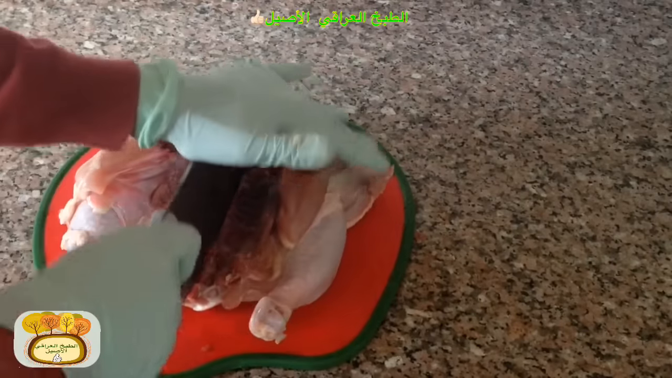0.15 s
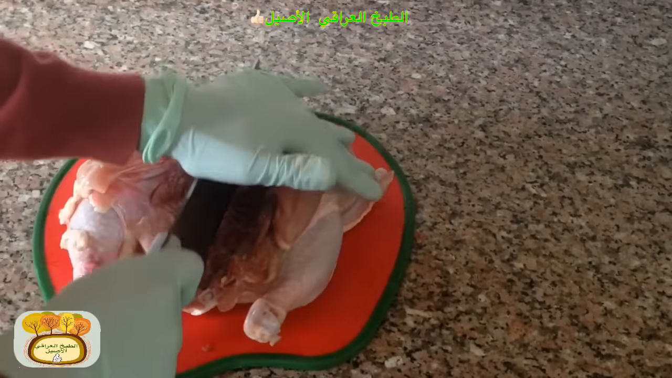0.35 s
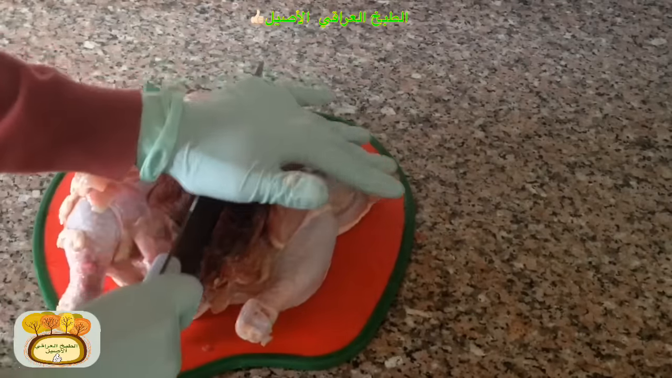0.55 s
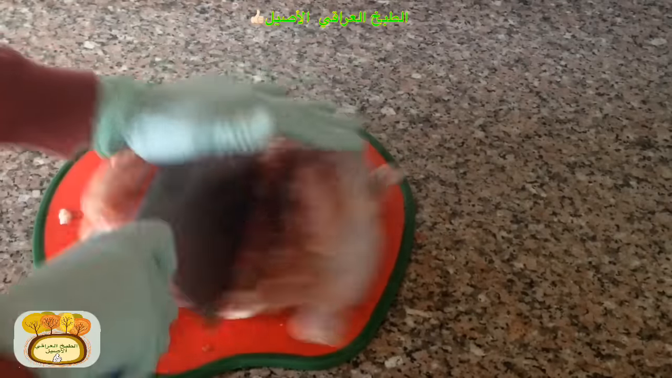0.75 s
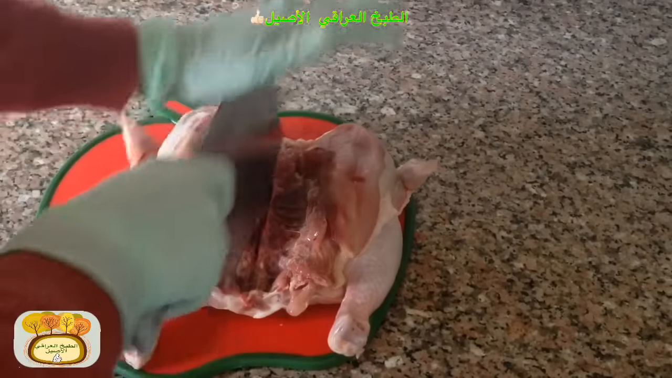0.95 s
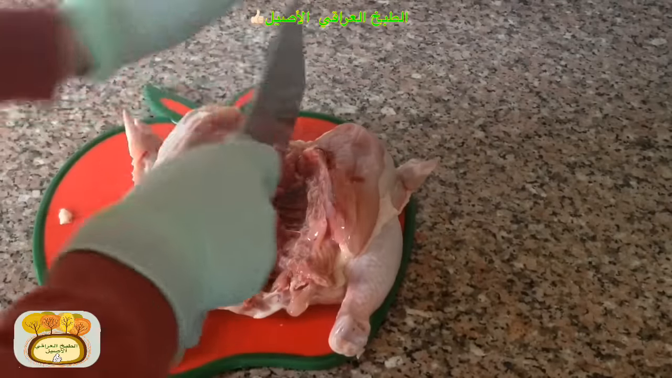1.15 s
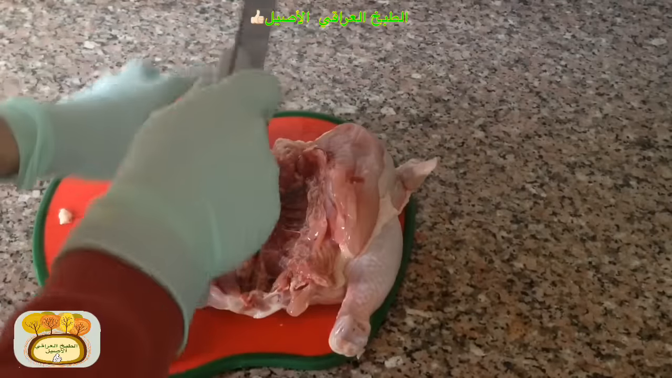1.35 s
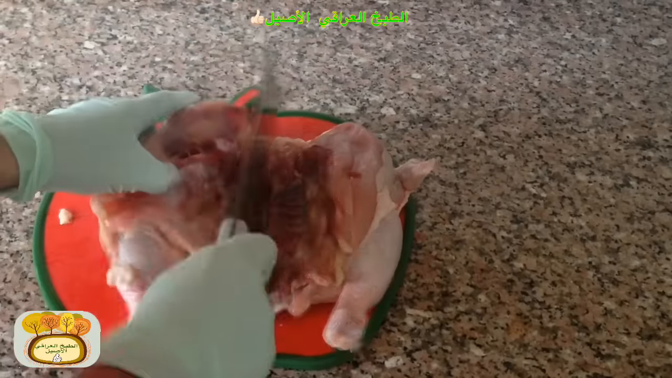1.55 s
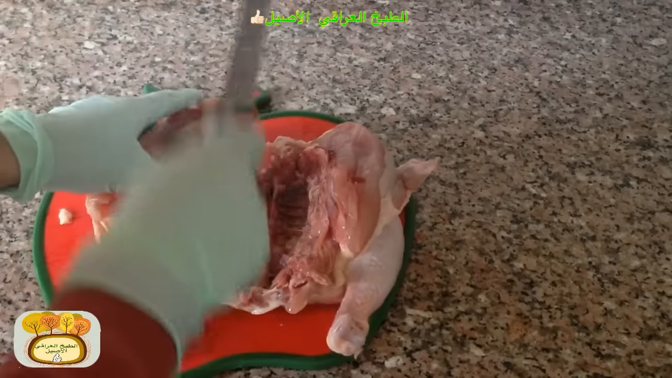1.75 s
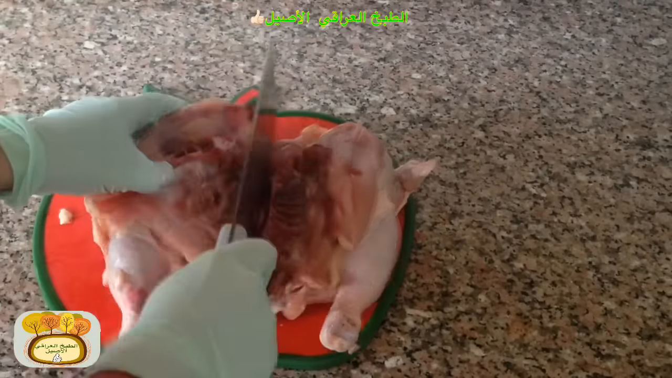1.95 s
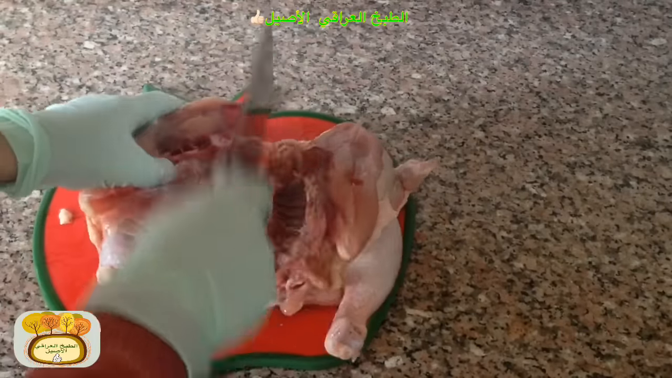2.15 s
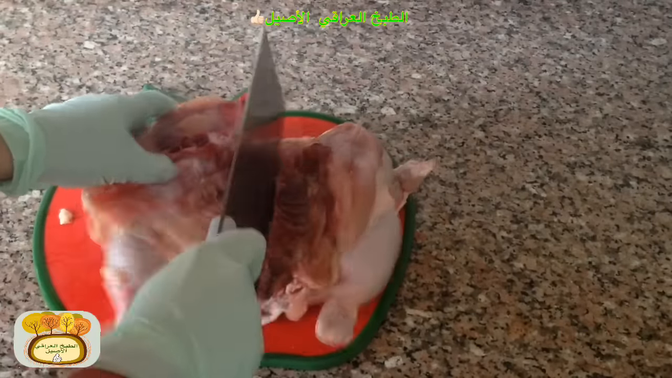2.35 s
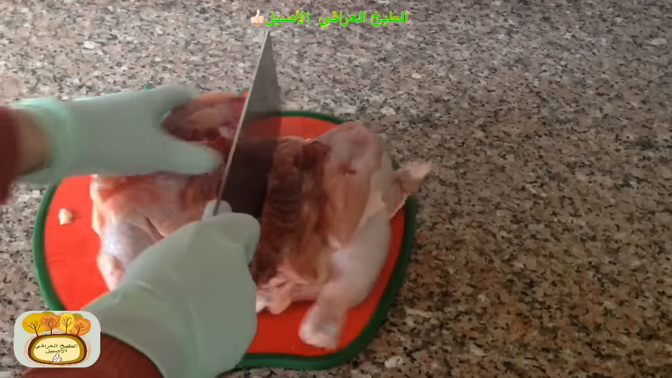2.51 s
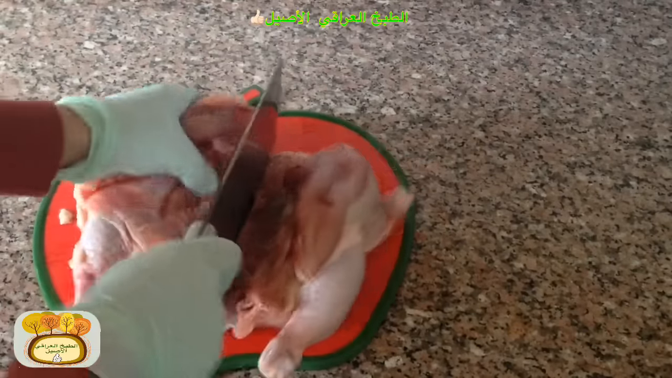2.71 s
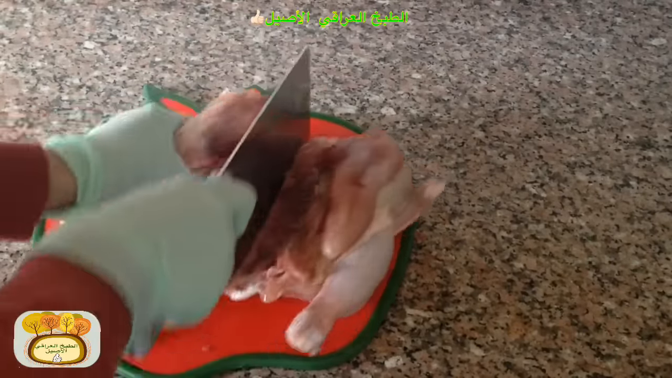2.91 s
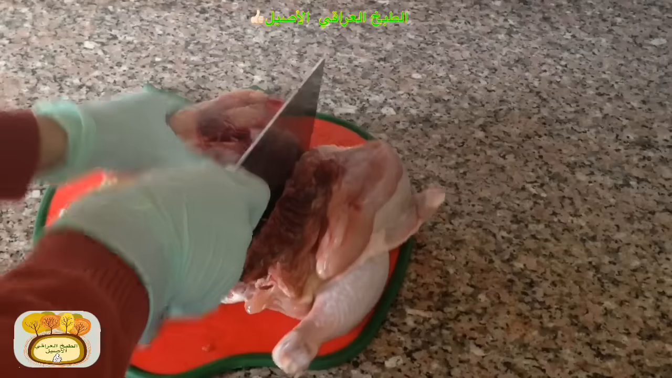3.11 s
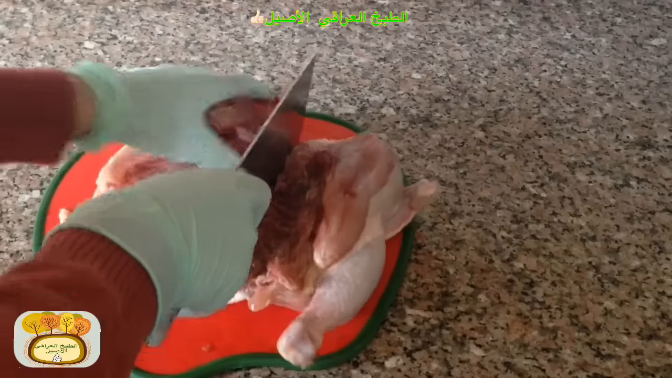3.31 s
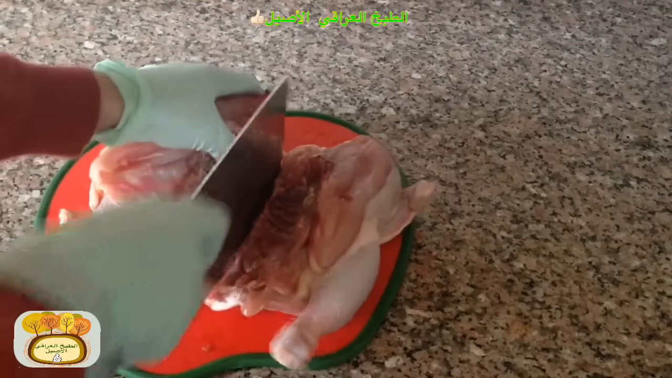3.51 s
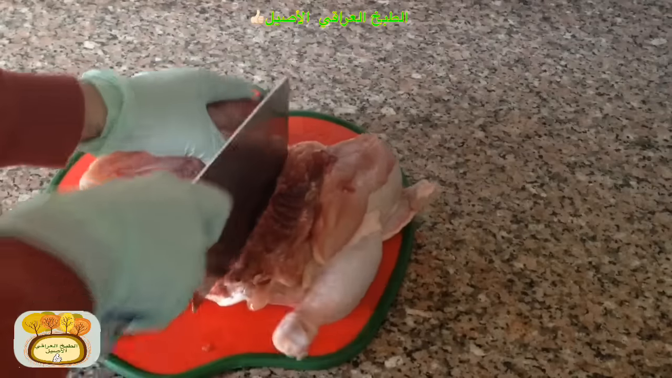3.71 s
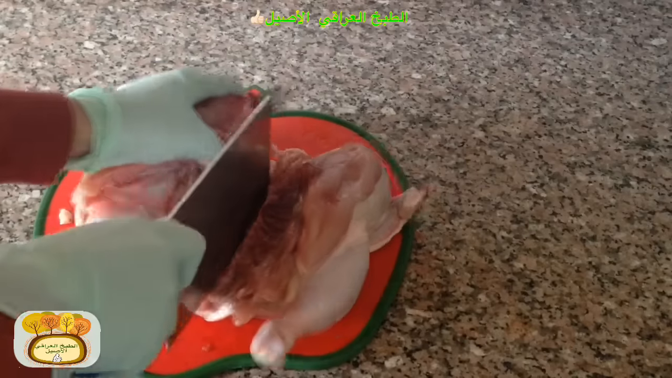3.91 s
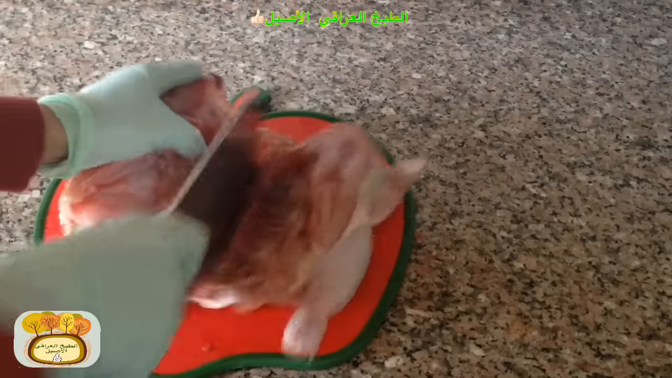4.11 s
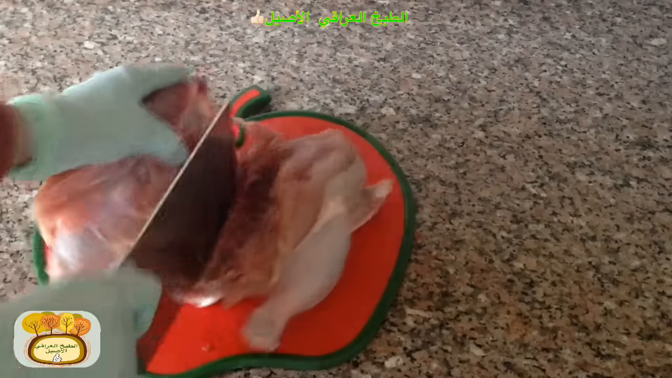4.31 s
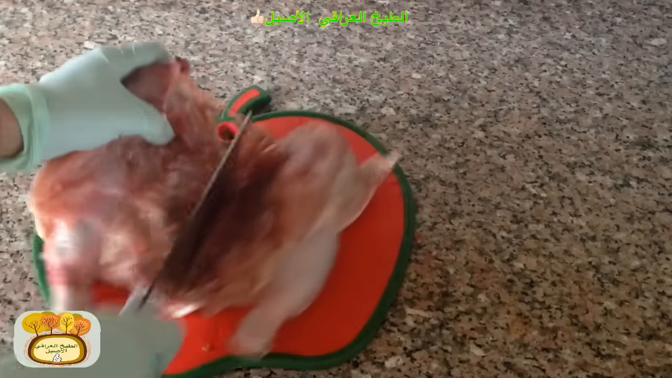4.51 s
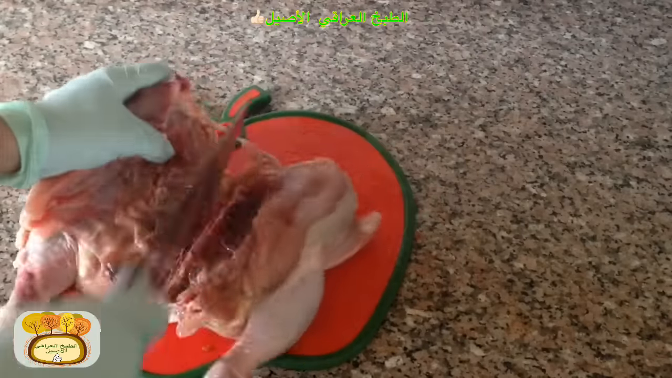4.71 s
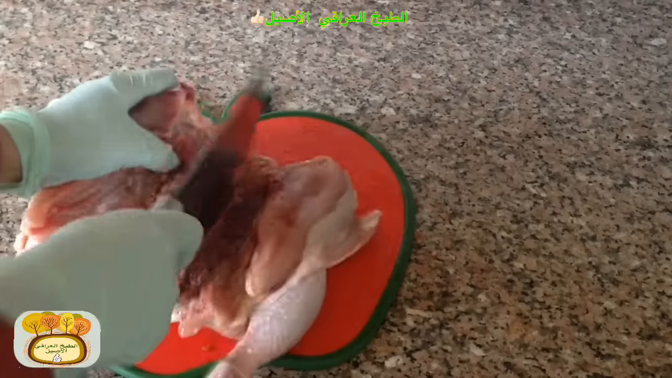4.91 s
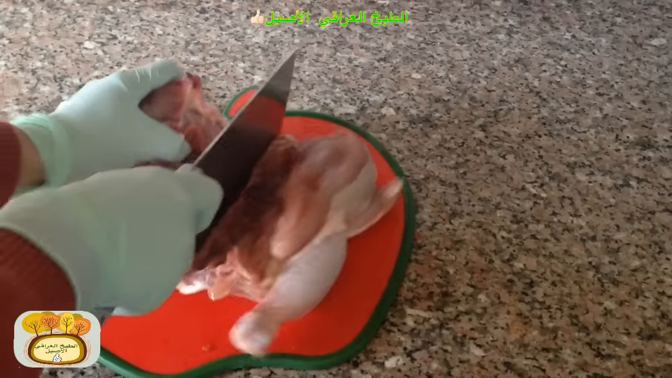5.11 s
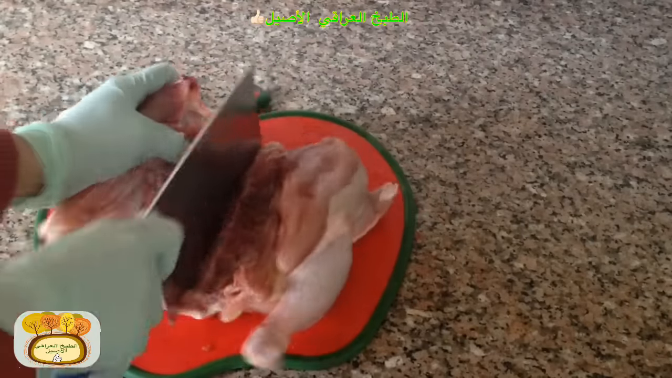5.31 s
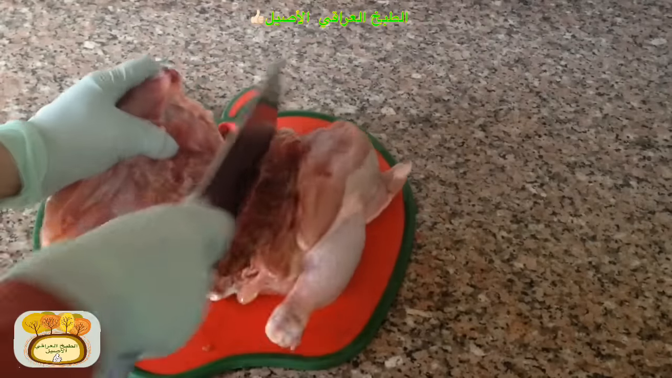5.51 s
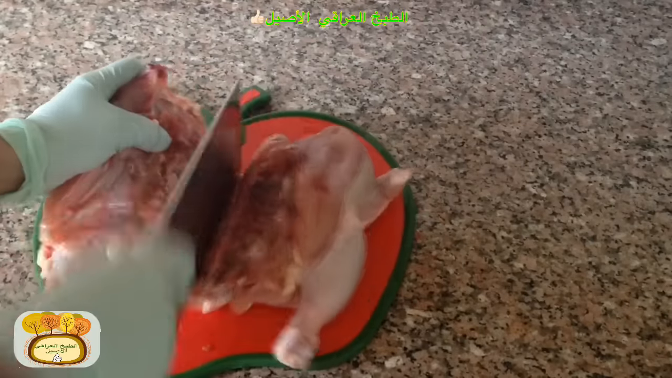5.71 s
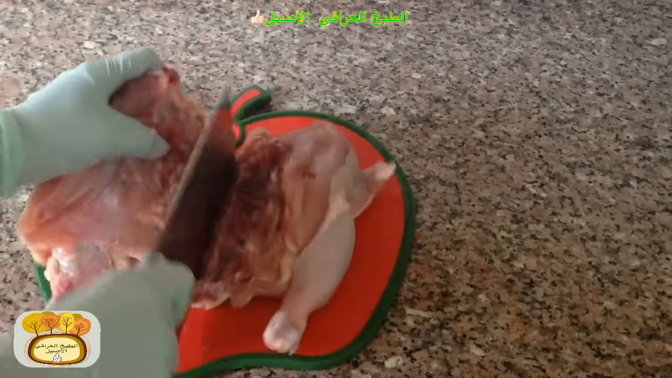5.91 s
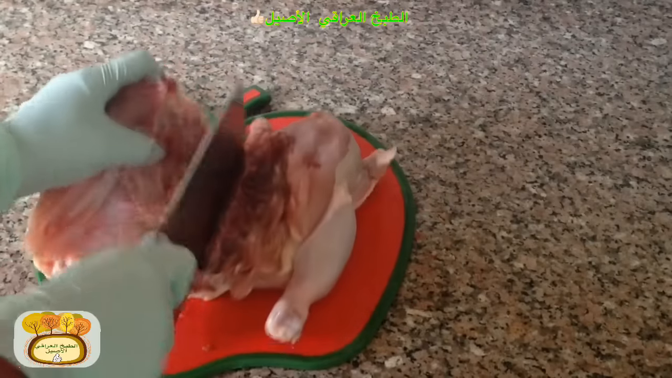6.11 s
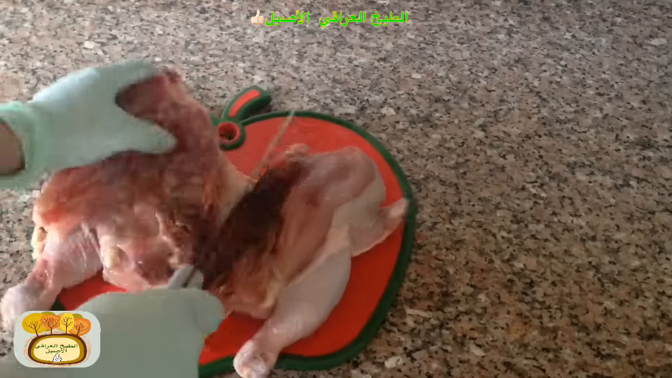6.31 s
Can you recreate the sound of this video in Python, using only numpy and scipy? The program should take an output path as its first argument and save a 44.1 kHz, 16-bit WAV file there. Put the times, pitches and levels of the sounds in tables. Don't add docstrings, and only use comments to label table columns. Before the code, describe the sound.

A nearby phone hears chicken being cut on a plastic board over a stone counter, in a bare kitchen with nearly a second of reverberation. Faint hiss opens the scene. Around 0.36 s two woody chops land almost together, with a soft rock of the board, then small snaps, sticky peels and glove rubs until about 0.9 s. At 1.6 s a slow cut squelches in with a deep low thud; at 2.0 s a harder chop tears and knocks; at 2.4 s comes the loudest, a bright, hard crack whose tail fades across the room. From 2.7 s only light clicks and peels follow, with a crisp bone snap at 3.7 s amid rubber rustle. Tiny wet ticks and meat drags continue. At 5.3-5.45 s two light blade taps mingle with sharp cartilage cracks, then sparse crackles and faint rubbing last to about 6.3 s.

```python
import sys
import numpy as np
from scipy import signal
from scipy.fft import rfft, irfft
from scipy.io import wavfile

SR = 44100
rng = np.random.default_rng(int(sys.argv[2]) if len(sys.argv) > 2 else 0)


def convert_level_to_amplitude(level_db):
    exponent = np.asarray(level_db, float) / 20
    return 10 ** exponent


def unload_wav(signal):
    wavfile.write(
        sys.argv[1],
        SR,
        np.round(np.clip(np.atleast_2d(signal).T, -1, 1) * 32767).astype(np.int16),
    )


N = 280035


def level(x, db):
    return x * convert_level_to_amplitude(db) / np.sqrt(np.mean(x ** 2))


def peak(x, db):
    return x * convert_level_to_amplitude(db) / np.abs(x).max()


def on_log(hz, table):
    at, value = np.transpose(table)
    return np.interp(np.log(np.maximum(hz, 1)), np.log(at), value)


def colour(x, table):
    hz = np.fft.rfftfreq(len(x), 1 / SR)
    return irfft(rfft(x) * convert_level_to_amplitude(on_log(hz, table)), len(x))


def ring(x, hz, width_hz):
    pole = np.exp((2j * np.pi * hz - np.pi * width_hz) / SR)
    return signal.lfilter([1], [1, -pole], x).imag


def add(out, start_s, x):
    i = int(start_s * SR)
    out[i:i + len(x)] += x[:N - i]


def crackle(size, scatter_db):
    strength = np.minimum(rng.exponential(size=size), 4.5)
    return rng.standard_normal(size) * convert_level_to_amplitude(scatter_db * strength)


def blows(spread):
    # start_s, board_db, tear_db, sink_s, thud_db
    blow_table = [
        (0.3639, -12, -7.5, 0.00037, -34.5),
        (0.387, -12.5, -12, 0.00045, -33),
        (1.604, -10, -12, 0.004, -11.5),
        (2.0062, -3.5, -0.5, 0.0024, -19),
        (2.408, 3.5, 4, 0.0012, -41.5),
        (5.341, -23, -28, 0.0011, -26.5),
        (5.4122, -21.5, -39.5, 0.002, -41),
    ]
    # frequency_hz, width_hz, level_db
    board_modes = [
        [(1000, 140, -2.5), (1216, 99, 3.5), (2282, 430, -16), (3330, 210, -5.5), (8300, 2000, -5)],
        [(1030, 160, 17), (1332, 200, -4.5), (8000, 1500, -11)],
        [(580, 100, -5.5), (797, 150, -5.5), (1230, 210, -1.5), (1526, 220, -9)],
        [(378, 36, -19.5), (577, 110, -13), (1020, 62, -3), (1700, 54, -13), (2070, 120, -19.5),
         (3100, 140, -23.5)],
        [(503, 81, -17.5), (783, 71, -3.5), (1090, 130, -0.5), (1288, 99, -7.5), (1520, 62, -0.5),
         (2480, 320, -3), (3900, 190, 0)],
        [(580, 38, -13), (1175, 130, -7), (1980, 390, -16)],
        [(596, 85, 0.5), (1290, 110, -5), (1860, 340, 5)],
    ]
    # frequency_hz, density_db
    tear_colour = [(880, -1.5), (1500, -2.5), (3380, -7.5), (4780, -12), (12100, -17), (13400, -27.5),
                   (15200, -20.5), (16000, -15)]
    thud_base_hz, thud_knee_db, thud_sag_hz_per_db = 214.5, -11.5, 7
    out, lead_s = np.zeros(N), 0.02
    t = np.arange(SR // 8) / SR - lead_s
    for (start_s, board_db, tear_db, sink_s, thud_db), modes in zip(blow_table, board_modes):
        cut = t + 0.48 * sink_s
        entry = np.clip(1 + cut / (4.0 * sink_s), 0, 1)
        swell = np.where(cut < 0, entry ** 2, np.exp(-cut / 0.0043))
        tear = colour(crackle(len(t), scatter_db=2.5), tear_colour) * swell

        chatter = rng.standard_normal(len(t)) * np.exp(-np.abs(t - 0.0015) / 0.00042) * (t > -sink_s)
        push = np.exp(-(t / 0.00028) ** 2) + 0.77 * chatter
        knock = np.zeros(len(t))
        for k, (hz, width_hz, db) in enumerate(modes):
            mode = ring(push, hz, spread * max(width_hz, 30))
            knock += (-1) ** k * convert_level_to_amplitude(db) * width_hz / hz * mode

        press = np.exp(-((t + 1.8 * sink_s) / 0.00068) ** 2)
        shove = press - 0.81 * np.exp(-(t / 0.00047) ** 2)
        thud_hz = thud_base_hz - thud_sag_hz_per_db * max(board_db - thud_knee_db, 0)
        cupboard = ring(shove, 115, 40) + 2.0 * ring(shove, 51, 10)
        thud = ring(shove, thud_hz, 40 * spread ** 2) + convert_level_to_amplitude(0.76 * board_db) * cupboard

        struck = peak(np.gradient(thud), thud_db) - peak(np.gradient(knock), board_db)
        add(out, start_s - lead_s, peak(tear, tear_db) + struck)
    return out


def ticks():
    # start_s, snap_db, knock_db, snap_hz
    bone_table = [(0.4844, -37, -28.5, 2530), (0.9218, -20.5, -49, 3560), (2.7267, -36, -50, 3150),
                  (2.838, -35.5, -53, 3860), (3.6371, -46, -44.5, 3760), (3.6711, -35.5, -32, 2800),
                  (3.718, -15.5, -26.5, 8150), (3.9656, -42, -49, 3230), (4.0065, -28, -35.5, 8950),
                  (4.027, -29.5, -44, 5110), (4.074, -35, -48.5, 4300), (4.3703, -45, -44.5, 6780),
                  (4.5665, -30, -52.5, 5500), (5.0025, -36.5, -49, 3900), (5.012, -35.5, -51.5, 3900),
                  (5.0896, -44.5, -58, 2730), (5.3544, -14, -36, 3300), (5.3867, -21, -35, 3270),
                  (5.4399, -34, -35, 2650), (5.8229, -40.5, -47, 3070), (5.874, -35, -40.5, 3810),
                  (5.884, -42, -37.5, 2750), (5.933, -39, -46.5, 3440), (5.973, -37, -50, 3360),
                  (6.262, -61, -47.5, 3000)]
    # start_s, snap_db, snap_hz
    peel_table = [(0.6668, -36, 4967), (0.7716, -34.5, 9300), (0.864, -47, 4100), (2.9273, -35.5, 3320),
                  (2.9895, -24, 3530), (3.209, -46, 2570), (3.4269, -46, 3430), (4.1829, -44.5, 3670),
                  (4.5525, -33.5, 5680), (4.571, -25.5, 3600), (4.6757, -48, 12500), (4.9741, -48.5, 11100),
                  (5.2447, -36, 3830), (5.2883, -32.5, 7000), (5.368, -23, 3700), (5.5518, -38, 3100),
                  (5.712, -41, 5920), (6.086, -49, 9430), (6.1654, -44, 8900), (6.3081, -42, 8700),
                  (4.113, -46, 12000), (6.257, -49.5, 9050), (6.322, -47, 8400)]
    # start_s, snap_db, edge_db, knock_db, snap_hz, decay_s
    bones = [(s, db, -17.5, knock_db, hz, 0.0042) for s, db, knock_db, hz in bone_table]
    peels = [(s, db, -9.5, db - 23, hz, 0.0034) for s, db, hz in peel_table]
    out, t = np.zeros(N), np.arange(SR // 16) / SR
    for start_s, snap_db, edge_db, knock_db, snap_hz, decay_s in bones + peels:
        envelope = np.exp(-t / decay_s) * (1 - np.exp(-t / 0.000255))
        burst = crackle(len(t), scatter_db=-0.5) * envelope
        burst = burst + 2.5 * np.exp(-((t - 0.0004) / 0.00005) ** 2)
        snap = ring(ring(burst, snap_hz, 0.51 * snap_hz), snap_hz, 0.82 * snap_hz)
        edge = np.gradient(ring(ring(burst, 10400, 8000), 8300, 7900))
        knock = ring(burst, 1377, 410) + 0.59 * ring(burst, 580, 284) + 0.246 * ring(burst, 195, 93)
        bright = peak(snap, snap_db - 2.0) + peak(edge, snap_db + edge_db + 4)
        add(out, start_s, bright + peak(knock, knock_db + 1.0))
    return out


def rubbing():
    # start_s, length_s, hiss_db
    glove_table = [(0.635, 0.033, -53.5), (0.855, 0.018, -57), (2.706, .02, -58), (2.844, 0.038, -60),
                   (3.439, 0.12, -62.5), (3.518, 0.047, -59), (3.579, 0.071, -65), (3.695, 0.076, -43),
                   (3.873, 0.098, -55), (4.005, 0.082, -49), (4.965, 0.053, -64.5), (5.705, 0.037, -59.5),
                   (6.251, 0.066, -62.5), (6.301, 0.044, -58)]
    # start_s, length_s, hiss_db, drag_db
    meat_table = [(0.35, 0.019, -66, -51), (0.787, 0.071, -56.5, -59), (0.915, 0.022, -48, -55.5),
                  (3.65, 0.057, -61, -50), (3.722, 0.032, -49, -44), (4.19, 0.12, -51.5, -67.5),
                  (4.359, 0.15, -63, -67), (4.572, 0.022, -50, -70), (4.996, 0.048, -51, -57.5),
                  (5.232, 0.062, -47, -66.5), (5.291, 0.11, -59, -77), (5.326, 0.054, -61, -41.5),
                  (5.353, 0.095, -45.5, -42), (5.777, 0.074, -52.5, -62), (5.866, 0.061, -51, -54.5),
                  (5.924, 0.077, -58.5, -66)]
    # frequency_hz, density_db
    rub_colour = [(880, -52), (1500, -27.5), (1710, -14.5), (3120, -11.5), (5440, -16), (14600, -16),
                  (15500, -35), (16000, -40)]
    # start_s, length_s, hiss_db, band_hz, drag_db
    gloves = [(s, length_s, db, 8900, db - 14.5) for s, length_s, db in glove_table]
    meat = [(s, length_s, db, 3600, drag_db) for s, length_s, db, drag_db in meat_table]
    patch_hz, patch_db = 2000 * 1.3 ** np.arange(9), 3
    out = np.zeros(N)
    for start_s, length_s, hiss_db, band_hz, drag_db in gloves + meat:
        n = int(length_s * SR)
        grain = crackle(SR // 6, scatter_db=4.0)
        dull = crackle(SR // 6, scatter_db=4.0)
        band = np.gradient(ring(grain, band_hz, 0.23 * band_hz))
        hiss = level(colour(grain, rub_colour), 0) + level(band, -14)
        hiss = colour(hiss, [(hz, patch_db * rng.standard_normal()) for hz in patch_hz])
        drag = ring(dull, 910, 1650)
        slips = convert_level_to_amplitude(1.5 * np.repeat(rng.standard_normal(SR // 600), 120))
        stroke = signal.windows.tukey(n, 0.9) * np.geomspace(1.6, 0.4, n) * slips[:n]
        add(out, start_s, stroke * (level(hiss, hiss_db) + level(drag, drag_db))[:n])
    return out


def specks(count=90):
    from_s, loudest_db, scatter_db, decay_s = 3.7, -61.5, 3.5, 0.001
    out, t = np.zeros(N), np.arange(SR // 100) / SR
    for when, pitch, size in rng.random((count, 3)):
        hz = 2500 * 5.5 ** pitch
        burst = rng.standard_normal(len(t)) * np.exp(-t / decay_s)
        pop = ring(ring(burst, hz, 0.35 * hz), hz, 0.35 * hz)
        start_s = from_s + when * (N / SR - from_s)
        add(out, start_s, peak(pop, loudest_db - scatter_db * np.log(1.01 - size)))
    return out


def rocking():
    # start_s, level_db, pitch_hz
    rock_table = [(0.422, -27, 91), (0.643, -46, 73), (0.808, -46, 116), (0.919, -69, 121),
                  (1.722, -34, 50), (2.199, -42, 61), (2.631, -41, 57.6), (2.708, -56, 91.4),
                  (2.569, -36, 99.8), (3.799, -56.5, 60), (4.072, -55, 70), (4.373, -51, 114),
                  (5.612, -61.5, 91), (5.821, -60, 120), (6.259, -57.5, 170)]
    out, t = np.zeros(N), np.arange(SR // 5) / SR
    contact = np.exp(-((t - 0.006) / 0.00084) ** 2)
    for start_s, db, hz in rock_table:
        add(out, start_s, peak(ring(contact, hz, 45), db))
    return out


def board(spread):
    small_cut = signal.butter(2, 140, "high", fs=SR, output="sos")
    heavy_cut = signal.butter(4, 42, "high", fs=SR, output="sos")
    small = signal.sosfilt(small_cut, ticks() + rubbing() + specks())
    heavy = signal.sosfilt(heavy_cut, blows(spread))
    return heavy + small + rocking()


def near(x):
    # delay_s, level_db
    echoes = [(.0028, -20), (.0061, -11.5), (0.0117, -14.5)]
    dulled = signal.lfilter([0.4], [1, -0.6], x)
    return x + sum(convert_level_to_amplitude(db) * np.roll(dulled, int(delay_s * SR)) for delay_s, db in echoes)


def wall(x, wet_db=-17):
    # frequency_hz, t60_s
    kitchen_t60 = [(60, 0.24), (160, .75), (420, 0.66), (900, 0.91), (1600, 0.85), (3200, 0.87), (5500, .8),
                   (9000, 0.52), (15000, 0.12)]
    # frequency_hz, gain_db
    kitchen_gain = [(60, 2.5), (160, 3), (420, -0.5), (900, -1.5), (1600, 2), (3200, -3), (5500, -1),
                    (9000, -1), (15000, -2.5)]
    t = np.arange(3 * SR // 2) / SR
    tail = np.zeros(len(t))
    for hz in 40 * 2 ** np.arange(0, 8.7, 0.25):
        noise = rng.standard_normal(len(t))
        band = level(ring(ring(noise, hz, 0.3 * hz), hz, 0.3 * hz), 0) * np.sqrt(hz)
        tail += band * convert_level_to_amplitude(on_log(hz, kitchen_gain) - 60 * t / on_log(hz, kitchen_t60))
    build_up = (1 - 0.3 * np.exp(-(t / 0.023) ** 2)) * (t > 0.004)
    tail = tail * build_up
    return signal.fftconvolve(x, tail * convert_level_to_amplitude(wet_db) / np.sqrt(np.sum(tail ** 2)))[:N]


def background(work):
    # frequency_hz, density_db
    floor_colour = [(15, -40.5), (25, -26.5), (97, -1), (301, -7.5), (416, -6.5), (489, -10), (1130, -15),
                    (1610, -10.5), (2350, -20), (3340, -13.5), (3820, -14.5), (14400, -17), (16000, -16)]
    floor = level(colour(rng.standard_normal(N), floor_colour), -62)
    keep = np.exp(-1 / (0.7 * SR))
    loudness = signal.lfilter([1 - keep], [1, -keep], np.abs(work))
    return floor / (1 + 30 * loudness)


def scene():
    direct = near(board(spread=0.77))
    reverberant = sum(wall(board(spread=1.9)) for _ in range(6))
    work = direct + reverberant
    return (work + background(work))[None]


def band_limit(x):
    return signal.sosfilt(signal.butter(12, 16500, fs=SR, output="sos"), x)


def record(dry):
    soft = 0.95 * np.tanh(dry[0] / 0.95)
    top = colour(soft, [(20, -3), (40, 0), (15200, 0), (15500, -30), (16400, -34), (16600, -70)])
    return band_limit(top[None])


dry = scene()
out = record(dry)
unload_wav(out)
```